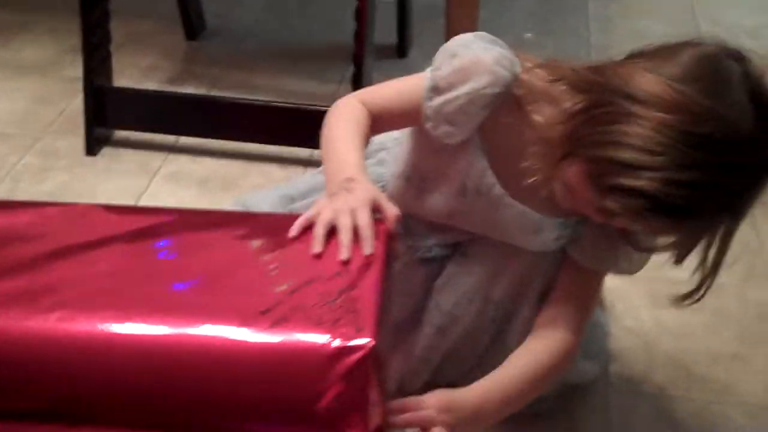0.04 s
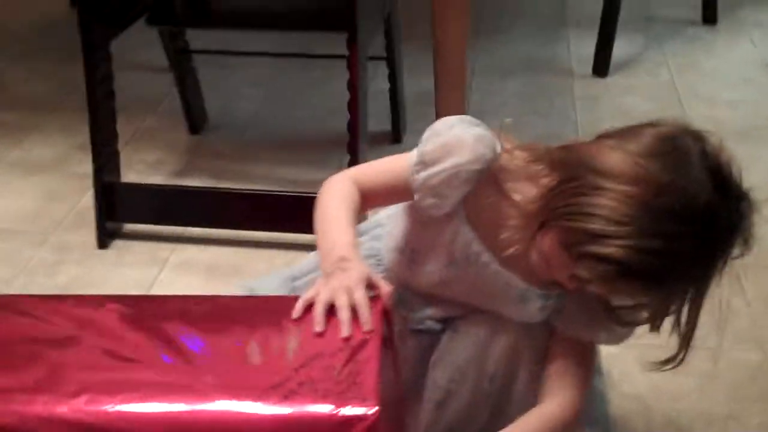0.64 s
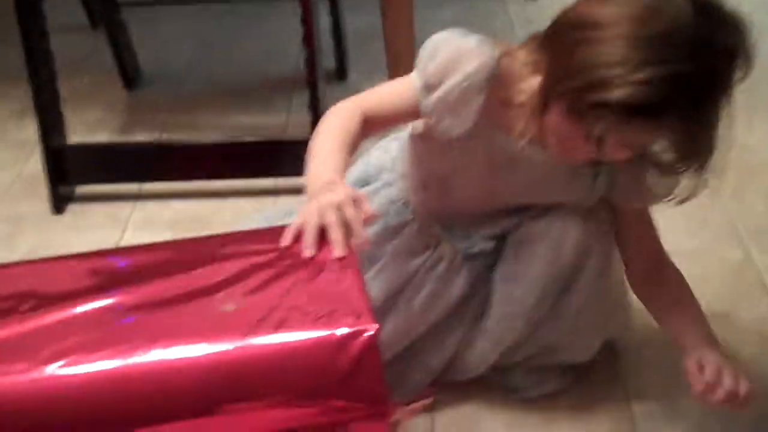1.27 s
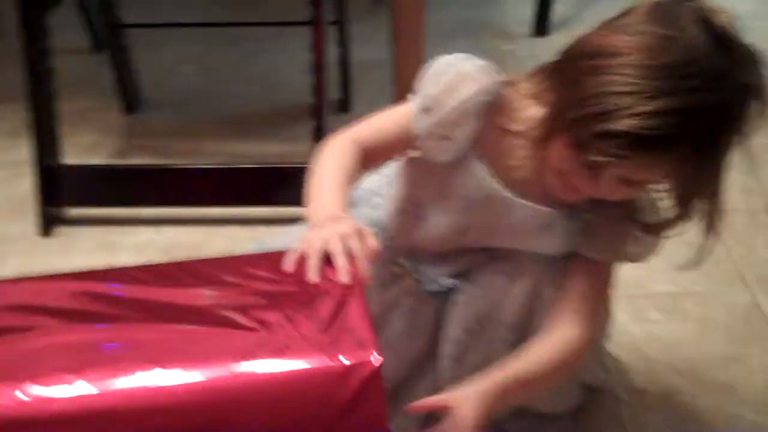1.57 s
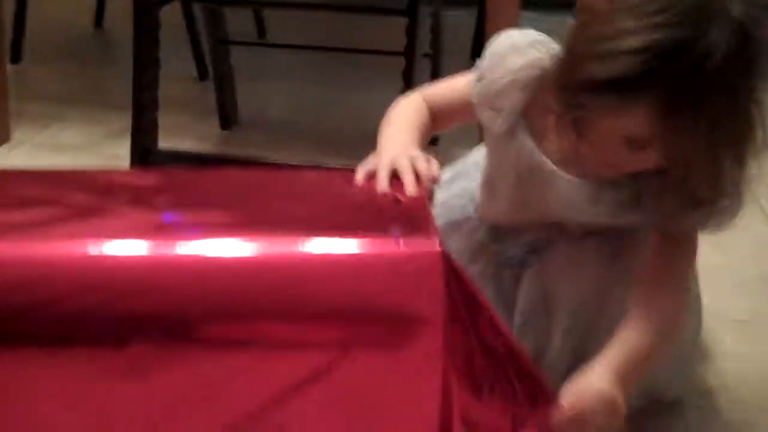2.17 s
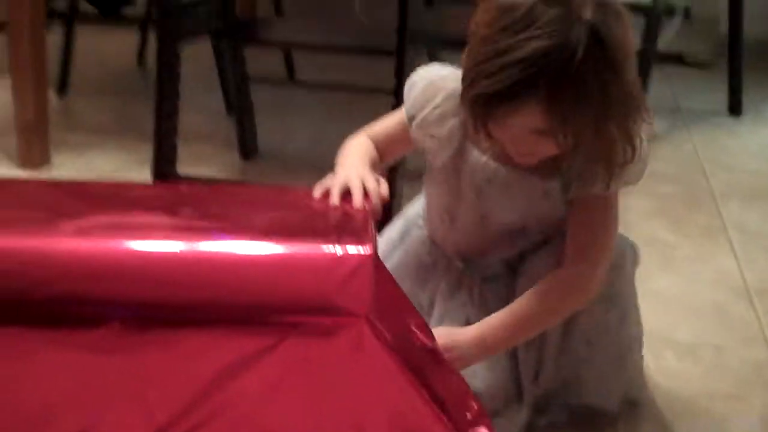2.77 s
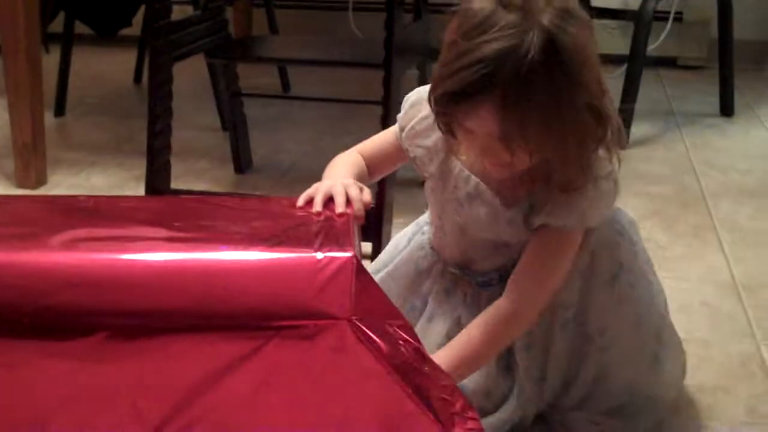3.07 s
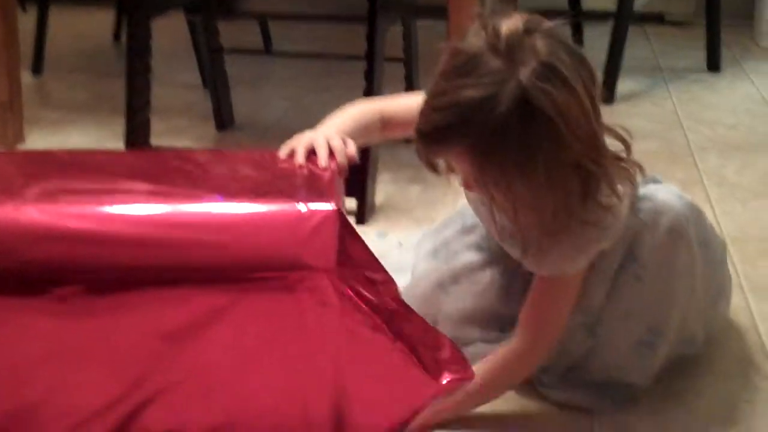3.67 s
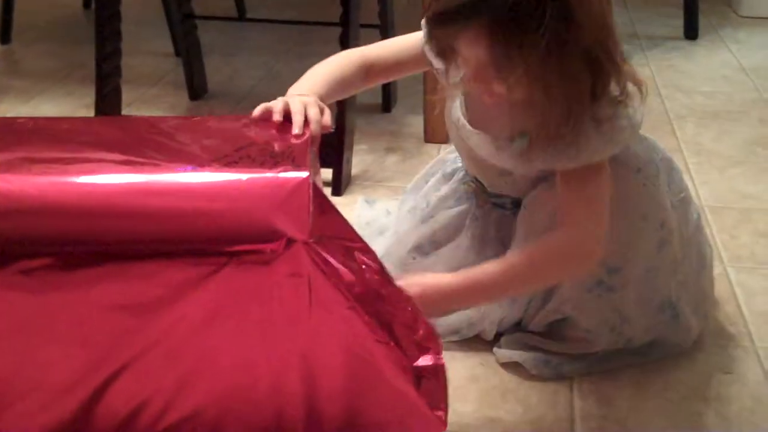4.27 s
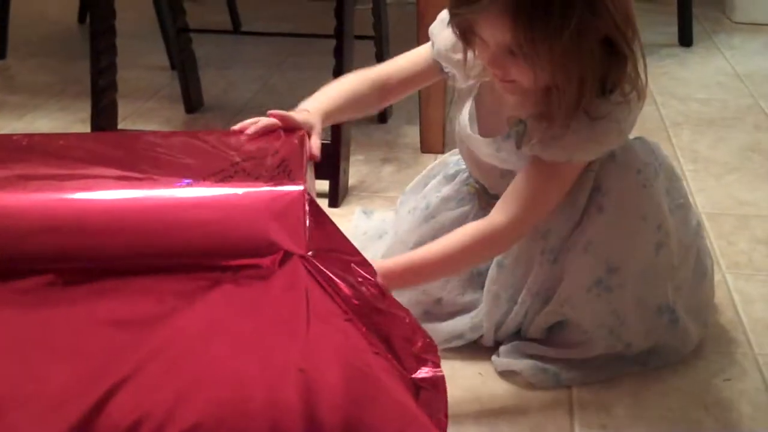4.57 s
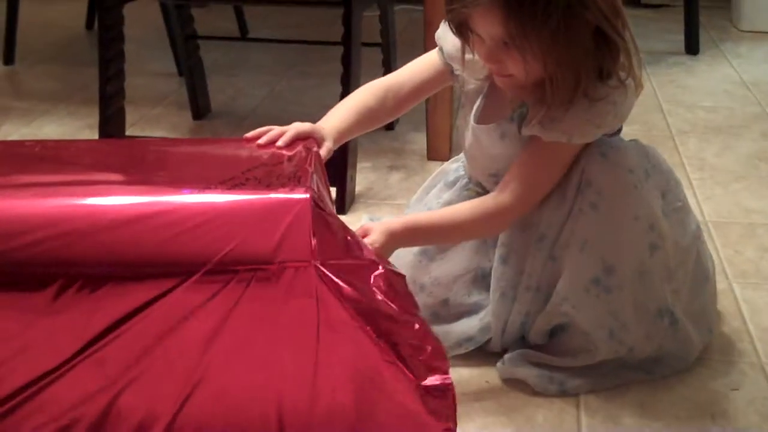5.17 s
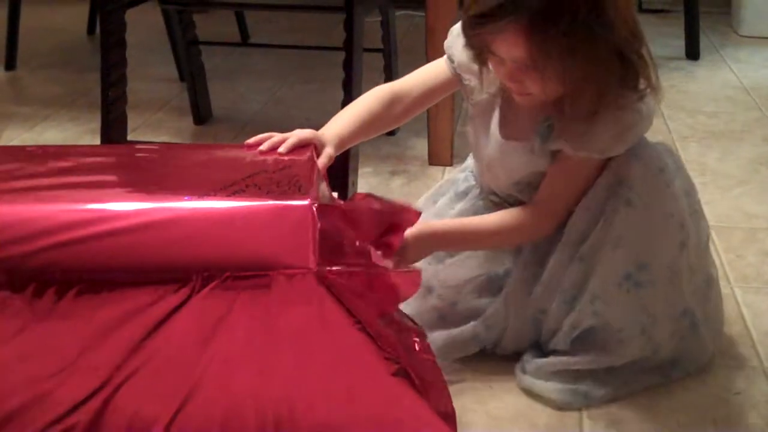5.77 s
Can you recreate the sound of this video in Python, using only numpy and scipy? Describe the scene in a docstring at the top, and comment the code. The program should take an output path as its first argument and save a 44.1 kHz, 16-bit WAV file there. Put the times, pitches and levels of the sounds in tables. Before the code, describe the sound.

Sharp, bright crinkles of foil gift wrap being gripped and folded around a large box indoors, with a few soft hollow thuds.

```python
"""A child grips and pulls the foil wrapping of a large box on a tiled kitchen floor, over a soft hiss.
First, creases snap one by one and fine crackle follows the hands. Near 1 s a whole panel buckles in a
dense run of clicks, and the box and the loose sheet bump dully. After a lull come more bursts, near 2 s
and from 3.2 s, then scattered snaps up to the loudest one at 5.65 s. All along, two small microphones
ring near 7 kHz, and they overload on the loudest snaps."""
import sys
import numpy as np
from scipy import signal
from scipy.fft import rfft, irfft, next_fast_len
from scipy.io import wavfile
from scipy.ndimage import uniform_filter1d, minimum_filter1d

SR = 44100
rng = np.random.default_rng(int(sys.argv[2]) if len(sys.argv) > 2 else 0)


def put_to_file(sound):
    """Save the sound as 16-bit audio at rate SR, in the file named by the first command-line argument."""
    columns = np.atleast_2d(sound).T  # one column per channel
    safe = np.clip(columns, -1, 1)
    whole_steps = np.round(safe * 32767)
    wavfile.write(sys.argv[1], SR, whole_steps.astype(np.int16))


N = 266364
FFT_SIZE = next_fast_len(N + SR, real=True) // 2 * 2   # spare room for echoes to die away
FREQS = np.arange(FFT_SIZE // 2 + 1) * SR / FFT_SIZE
FACETS_HZ = np.linspace(2800, 10500, 8)   # pitches of the facets, the flat patches between creases


# Loud or lone creases flipping over: start_s, level_db, pitch_hz, body_offset_db
SNAPS = [(0.066, -11.5, 7100, -20), (0.206, -11.5, 6300, -9), (0.278, -12, 8300, -24),
         (0.3542, -8.5, 6800, -6.5), (0.4362, -14, 8900, -25), (0.504, -19.5, 5000, -4),
         (0.5754, -9.5, 9500, -20), (0.6534, 2, 8800, -27), (0.6737, -4.5, 5100, -22),
         (0.732, 3, 5000, -27), (0.7757, -4, 7700, -23), (0.8169, -5.5, 7900, -10), (0.8826, -3, 7900, -11),
         (0.9126, -1, 8500, -31), (0.9541, -2, 10600, -34), (0.999, -0.5, 8200, -21.5),
         (1.0305, 12, 8100, -5), (1.0615, 5.5, 3700, -2), (1.223, -8, 8000, -16), (1.6615, -6, 10000, -16),
         (1.718, -2, 7100, -22), (1.7433, -3, 6800, -8), (1.818, -10, 7400, -25), (1.868, -11.5, 5600, -15),
         (1.918, -3.5, 6100, -12), (1.948, 2.5, 8200, -17), (2.0073, -4, 6800, -10),
         (2.0348, 2.5, 6400, -7), (2.0557, 9, 5100, -3.5), (2.194, -8.5, 6100, -17),
         (2.2221, -10, 7400, -4.5), (2.2326, -13, 6600, -22), (2.2874, -13, 6500, -12),
         (2.3125, -8.5, 4000, -4), (2.3375, -10.5, 6100, -19), (2.416, -4, 5800, -2),
         (2.4526, -5, 6000, -9), (2.509, 1, 7800, -16), (2.6015, -11.5, 5700, -25), (2.7093, -8, 5500, -7),
         (3.104, -20, 3700, -22), (3.1308, -20, 5100, -18), (3.1824, -13.5, 9600, -14),
         (3.2162, -3, 5400, -9.5), (3.245, 2.5, 5100, -28), (3.3243, -11.5, 7600, -18),
         (3.3702, -3.5, 10500, -12), (3.3866, -5.5, 7700, -25), (3.4036, -4.5, 4300, -11.5),
         (3.4906, -12, 5800, -17), (3.527, -10, 4400, -3.5), (3.577, 1.5, 3700, -25),
         (3.6417, -3.5, 5800, -8.5), (3.6872, 7.5, 7500, -8), (3.837, 0, 5200, -13.5),
         (3.9668, -8.5, 2700, -4.5), (3.9985, 5, 5700, -8.5), (4.0276, 2.5, 3000, -3),
         (4.0673, -2, 4700, -9), (4.4589, -5.5, 6800, -6), (4.62, -8, 6300, -9), (4.683, -2.5, 6700, -20),
         (4.7546, -2, 5300, -4), (4.7987, -0.5, 8400, -18), (4.8391, -7.5, 5800, -22),
         (4.8593, -8, 6400, -22), (4.9664, 4.5, 8000, -18), (5.096, -7.5, 5800, -3),
         (5.1894, -6.5, 3000, -5.5), (5.2044, -3.5, 7600, -18), (5.2314, -10, 6700, -7),
         (5.2851, -8, 6400, -12), (5.358, 1, 6100, -5.5), (5.432, 0, 6100, -13), (5.5302, -9, 8000, -15),
         (5.607, -3.5, 5300, -7), (5.6542, 15, 9000, -3.5), (5.8289, -7.5, 3900, -6),
         (5.9065, -4.5, 8100, -11), (5.959, -1, 4900, -15), (5.9817, 5.5, 6600, -13),
         (6.0254, -5, 5100, -8)]
def snaps(treble_db, body_db, shiver_s, shiver_gain, bounce_s, bounce_db):
    """A crease flips with a click and a shiver, striking a facet (treble) and the wide sheet (body)."""
    blows = np.zeros((2, len(FACETS_HZ), N))
    t = np.arange(256) / SR
    for start_s, level_db, pitch_hz, body_offset_db in SNAPS:
        nearest_facet = np.argmin(np.abs(FACETS_HZ - pitch_hz))
        treble, body = blows[:, nearest_facet]
        flip = shiver_gain * rng.standard_normal(len(t)) * np.exp(-t / shiver_s)
        flip[0] = rng.choice([-1, 1])   # the click
        flip *= from_db(level_db) / np.linalg.norm(flip)
        floor_echo = (bounce_s * rng.uniform(0.93, 0.99), from_db(bounce_db))
        for lag_s, gain in (0, 1), floor_echo:
            add(treble, start_s + lag_s, gain * from_db(treble_db) * flip)
            add(body, start_s + lag_s, gain * from_db(body_db + body_offset_db) * flip)
    return blows


# Panels of foil giving way: start_s, length_s, treble_db, body_db
BUCKLES = [(0.733, 0.0065, -12.5, -28), (1.028, 0.059, -9.5, -25), (2.053, 0.023, -5, -20.5),
           (2.088, 0.027, -5, -19), (3.242, 0.015, -16, -36), (3.686, 0.022, -12, -27),
           (3.728, 0.02, -13.5, -28.5), (5.652, 0.018, 2, -16)]
def buckles(per_s, spread_db, treble_gain_db, body_gain_db, crack_db, crack_s, release_s):
    """One crease sets off the next: a dense run of clicks that starts with a crack and dies quickly."""
    treble, body = np.zeros((2, N))
    t = np.arange(SR // 5) / SR
    crack = from_db(crack_db * np.exp(-t / crack_s))
    for start_s, length_s, treble_db, body_db in BUCKLES:
        shape = crack * np.exp(-np.maximum(t - length_s, 0) / release_s)
        add(treble, start_s, shape * from_db(treble_db + treble_gain_db))
        add(body, start_s, shape * from_db(body_db + body_gain_db))
    return np.array([treble, body]) * clicks(per_s, spread_db, window=300)


# The hands gripping or pulling: start_s, length_s, crackle_db, rustle_db
GRIPS = [(0.047, 0.08, -43.5, -44.5), (0.256, 0.13, -31, -48.5), (0.56, 0.06, -29.5, -44),
         (0.644, 0.18, -26, -42.5), (0.856, 0.09, -29, -44), (1.025, 0.067, -20.5, -31.5),
         (1.168, 0.15, -29.5, -41), (1.651, 0.05, -18.5, -33.5), (1.711, 0.06, -19.5, -32),
         (1.902, 0.15, -25, -37.5), (2.012, 0.035, -22, -33.5), (2.109, 0.089, -31, -38),
         (2.294, 0.22, -28.5, -39), (2.442, 0.064, -15.5, -29), (2.59, 0.15, -44.5, -51.5),
         (2.894, 0.027, -31, -42), (2.958, 0.052, -43, -52.5), (3.17, 0.066, -29.5, -39),
         (3.216, 0.045, -22.5, -31.5), (3.314, 0.22, -30, -44), (3.585, 0.09, -28, -39.5),
         (3.658, 0.091, -16.5, -31), (3.781, 0.12, -33, -41), (3.988, 0.018, -18.5, -30.5),
         (4.024, 0.057, -13.5, -30), (4.225, 0.03, -27.5, -42.5), (4.325, 0.053, -31.5, -45.5),
         (4.474, 0.038, -26.5, -43), (4.552, 0.052, -39, -45), (4.618, 0.25, -21.5, -36),
         (4.927, 0.13, -23.5, -40), (5.057, 0.081, -26.5, -41.5), (5.178, 0.15, -31.5, -43),
         (5.334, 0.098, -26.5, -37), (5.567, 0.12, -30.5, -46), (5.64, 0.075, -17, -30.5),
         (5.816, 0.18, -25.5, -39.5), (5.966, 0.063, -22.5, -34)]
def grips(attack_s, sag_db_per_s, release_s, rest_crackle_db, rest_rustle_db):
    """Each grip takes hold, eases off and lets go. Gives the crackle and rustle levels over time, in dB."""
    power = from_db([[rest_crackle_db], [rest_rustle_db]]) ** 2 * np.ones(N)
    t = np.arange(SR // 2) / SR
    hold = np.minimum(t / attack_s, 1) * from_db(-sag_db_per_s * t)
    for start_s, length_s, *levels_db in GRIPS:
        shape = hold * np.exp(-np.maximum(t - length_s, 0) / release_s)
        for track, level_db in zip(power, levels_db):
            add(track, start_s, (from_db(level_db) * shape) ** 2)
    return 10 * np.log10(power)


def crackle(crackle_db, rustle_db, base_per_s, spread_db, treble_db, body_db, tick_s):
    """Small creases tick faster as the hands work harder, over a soft rubbing of the sheet."""
    per_s = base_per_s * from_db(0.46 * (crackle_db - crackle_db.mean()))
    starts = clicks(per_s, spread_db, window=1200)
    fade = np.exp(-1 / (tick_s * SR))   # each tick is a short dying shiver
    tick_power = signal.lfilter([1 - fade], [1, -fade], starts ** 2 + 1e-12)
    ticks = np.sqrt(tick_power) * rng.standard_normal(N)
    rubbing = rng.standard_normal(N)
    treble = from_db(crackle_db + treble_db) * ticks
    body = from_db(rustle_db + body_db) * (ticks + rubbing)
    return np.array([treble, body])


def small_snaps(crackle_db, per_s, base_db, grip_share, spread_db, body_db):
    """Lesser creases flip at chance moments, louder under a firmer grip."""
    flips = (rng.random(N) < per_s / SR) * rng.choice([-1, 1], N)
    grip_db = grip_share * (crackle_db - crackle_db.mean())
    chance_db = spread_db * rng.uniform(-0.85, 1, N)
    treble = flips * from_db(base_db + grip_db + chance_db)
    return np.array([treble, from_db(body_db) * treble])


def wander(blows, stay_samples):
    """The crumpling keeps jumping to a facet picked by chance."""
    picks = rng.integers(0, len(FACETS_HZ), N // stay_samples + 1)
    active_facet = np.repeat(picks, stay_samples)[:N]
    return blows[:, None] * (active_facet == np.arange(len(FACETS_HZ))[:, None])


# The bright tone of a small crease: frequency_hz, level_db
CREASE_TONE = [(300, -45.5), (1200, -7), (2200, 1.5), (3200, 5), (5000, 0.5), (7000, -3), (9000, -2.5),
               (11500, 0.5), (14000, 7), (17000, -4)]
# The fuller tone of the wide sheet: frequency_hz, level_db
SHEET_TONE = [(50, -16), (130, -20.5), (280, -2), (430, -8), (650, -2.5), (1000, -1.5), (1600, 0.5),
              (2400, 4.5), (3500, 2.5), (6000, -8), (14000, -48.5)]
def foil(blows, facet_width_hz):
    """Each facet rings broadly at its pitch, shakes the sheet and has its own path through the room."""
    crease = tone_filter(CREASE_TONE)
    sheet = unit_power(tone_filter(SHEET_TONE))
    heard = 0
    for pitch_hz, treble, body in zip(FACETS_HZ, *rfft(blows, FFT_SIZE)):
        ring = unit_power(1j * FREQS * resonance(pitch_hz, facet_width_hz) * crease)
        heard = heard + (treble * ring + body * sheet) * kitchen(early_db=-2.5, late_db=-7.5)
    return irfft(heard)[:, :N]


# Dull bumps and hollow pops of the box and the loose sheet: start_s, level_db, pitch_hz
BUMPS = [(0.307, -43, 120), (0.43, -34.5, 72.6), (1.032, -37, 322), (1.069, -34, 278), (1.112, -39, 188),
         (1.2, -44, 106), (1.514, -47, 308), (1.662, -45, 198), (2.089, -29, 134.5), (2.92, -33.5, 221),
         (3.16, -39, 221), (3.5, -41, 848), (3.617, -43, 172), (3.738, -32.5, 700), (3.742, -29.5, 120.7),
         (3.798, -43, 83), (4.775, -41.5, 799), (5.354, -37, 1742), (5.652, -24, 245.2), (5.654, -27, 648),
         (5.934, -44.5, 315)]
def bumps(gain_db, rise_cycles, decay_cycles, least_decay_s, width_octaves):
    """A bump sets a panel ringing in many tones, strongest near its pitch; the low ones last longer."""
    track = np.zeros(N)
    t = np.arange(SR // 5) / SR
    for start_s, level_db, pitch_hz in BUMPS:
        octaves = (np.linspace(-1.2, 2, 14) + rng.uniform(-0.1, 0.1, 14))[:, None]
        tones_hz = pitch_hz * 2 ** octaves
        rise = 1 - np.exp(-t * tones_hz / rise_cycles)
        decay = np.exp(-t / (least_decay_s + decay_cycles / tones_hz))
        rings = rise * decay * np.sin(2 * np.pi * (tones_hz * t + rng.random(tones_hz.shape)))
        thud = np.sum(rings / (1 + (octaves / width_octaves) ** 2), axis=0)
        add(track, start_s, from_db(level_db + gain_db) * thud / np.std(thud[:SR // 25]))
    return track


def sheet_wobble(gain_db, decay_s, top_hz, width_hz):
    """After every bump the loose sheet wobbles on for a moment as a low, dying flutter."""
    swing = np.zeros(N)
    t = np.arange(SR // 2) / SR
    for start_s, level_db, _ in BUMPS:
        add(swing, start_s, from_db(level_db + gain_db) * np.exp(-t / decay_s))
    return filtered(swing * rng.standard_normal(N), unit_power(resonance(top_hz, width_hz)))


# The tone of the echoes, dull at the very top: frequency_hz, level_db
WALL_TONE = [(100, -2.5), (500, 2), (2500, 1.5), (7000, 0), (10000, -3.5), (14000, -5.5)]
def kitchen(early_db, late_db, early_fade_s=0.021, late_fade_s=0.34):
    """Sound arrives directly, then scattered by box and chairs, then as the ring of the tiled room."""
    t = np.arange(SR // 2) / SR
    echoes = 0
    for level_db, fade_s, start_s in (early_db, early_fade_s, 0.0006), (late_db, late_fade_s, 0.007):
        shape = from_db(-60 * t / fade_s) * (t > start_s)
        noise = rng.standard_normal((2, len(t)))
        echoes = echoes + from_db(level_db) * shape / np.linalg.norm(shape) * noise
    left_lag_s = 4.2e-5 + 1.2e-5 * rng.standard_normal()
    direct = np.array([np.exp(-2j * np.pi * FREQS * left_lag_s), np.ones(len(FREQS))])
    return direct + room_spread(echoes) * from_db(curve(WALL_TONE))


# The tone of the background hiss: frequency_hz, level_db
HISS_TONE = [(25, -18.5), (70, -6.5), (120, 4), (250, -3), (420, -2.5), (700, -2), (1300, -7.5), (2500, -8),
             (6000, -14.5), (14000, -17)]
# How loud the hiss is heard: time_s, level_db
HISS_LEVEL = [(0, -46), (1.6, -45), (2.7, -49), (4.2, -48), (6.04, -50)]
def background_hiss():
    """A soft, low background hiss, heard a little quieter after the first seconds."""
    noise = room_spread(rng.standard_normal((2, FFT_SIZE)))
    hiss = irfft(noise * unit_power(tone_filter(HISS_TONE)))[:, :N]
    level_db = np.interp(np.arange(N) / SR, *np.transpose(HISS_LEVEL))
    return from_db(level_db) * hiss


# How alike the room sounds at the two microphones: frequency_hz, likeness_0_to_1
LIKENESS = [(100, 0.85), (600, 0.91), (1400, 0.75), (2800, 0.25), (6000, 0), (12000, 1)]
def room_spread(noise_pair):
    """Blend two noises into left and right spectra, alike in the bass and at the very top."""
    shared, side = rfft(noise_pair, FFT_SIZE)
    alike = np.clip(curve(LIKENESS), 0, 1)
    return (np.sqrt(1 + alike) * shared + np.sqrt(1 - alike) * side * [[1], [-1]]) / np.sqrt(2)


def clicks(per_s, spread_db, window):
    """Random clicks, many small and few large, evened out in power over `window` samples."""
    heights = from_db(spread_db * np.minimum(rng.exponential(1, N), 4)) * rng.choice([-1, 1], N)
    train = heights * (rng.random(N) < per_s / SR)
    return train / np.sqrt(np.abs(uniform_filter1d(train ** 2, window)) + 1e-4)


def from_db(db):
    """Turn decibels into a gain."""
    return 10 ** (np.asarray(db) / 20)


def curve(points):
    """Join a table's points to get a value at every frequency."""
    hz, value = np.transpose(points)
    return np.interp(np.log(FREQS + 1), np.log(hz), value)


def tone_filter(points):
    """Turn a tone table into a filter in which nothing sounds early (minimum phase)."""
    cepstrum = irfft(np.log(from_db(curve(points))))
    cepstrum[1:FFT_SIZE // 2] *= 2
    cepstrum[FFT_SIZE // 2 + 1:] = 0
    return np.exp(rfft(cepstrum))


def unit_power(response):
    """Scale a filter so that white noise keeps its power."""
    return response / np.sqrt(np.mean(np.abs(response) ** 2))


def filtered(sound, response):
    """Pass a sound through a filter."""
    return irfft(rfft(sound, FFT_SIZE) * response)[..., :N]


def resonance(hz, width_hz):
    """A filter that passes the lows, rings near hz and fades above it."""
    return 1 / (1 - (FREQS / hz) ** 2 + 1j * FREQS * width_hz / hz ** 2)


def add(track, start_s, piece):
    """Mix a piece into a track."""
    start = max(0, round(start_s * SR))
    track[start:start + len(piece)] += piece[:max(0, N - start)]


def scene():
    """Foil, box and background hiss in the kitchen, in stereo."""
    crackle_db, rustle_db = grips(attack_s=0.015, sag_db_per_s=6, release_s=0.029,
                                  rest_crackle_db=-57, rest_rustle_db=-61)
    runs = buckles(per_s=6000, spread_db=1.5, treble_gain_db=-10.5, body_gain_db=-1.5,
                   crack_db=10, crack_s=0.0048, release_s=0.0017)
    ticks = crackle(crackle_db, rustle_db, base_per_s=850, spread_db=3.5,
                    treble_db=-9.5, body_db=-4.5, tick_s=0.00022)
    lesser = small_snaps(crackle_db, per_s=50, base_db=-21.5, grip_share=0.75, spread_db=5, body_db=-6.5)
    lone = snaps(treble_db=2, body_db=5, shiver_s=0.00068, shiver_gain=0.44,
                 bounce_s=0.0035, bounce_db=-15)
    crumpling = wander(runs + ticks + lesser, stay_samples=90)
    wrapping = foil(lone + crumpling, facet_width_hz=4600)
    thuds = bumps(gain_db=-1.5, rise_cycles=0.64, decay_cycles=0.83,
                  least_decay_s=0.0099, width_octaves=0.52)
    wobble = sheet_wobble(gain_db=-14, decay_s=0.079, top_hz=131, width_hz=170)
    box = filtered(thuds + wobble, kitchen(early_db=-17, late_db=-4.5))
    return wrapping + box + background_hiss()


def limiter(sound, ceiling_db, release_db_per_s, window):
    """The volume ducks just ahead of a peak above the ceiling and climbs back at a steady rate."""
    over_db = np.maximum(20 * np.log10(np.abs(sound).max(axis=0) + 1e-9) - ceiling_db, 0)
    climb_db = release_db_per_s * np.arange(N) / SR
    held_db = np.maximum.accumulate(over_db + climb_db) - climb_db
    gain_db = uniform_filter1d(minimum_filter1d(-held_db, window), window)
    return sound * from_db(gain_db)


# The duller tone of the right microphone: frequency_hz, level_db
RIGHT_MIC_TONE = [(100, -1.5), (1000, -1.5), (4000, -2), (6500, -1), (9000, -7), (14000, -13.5)]
def record(dry, cutoff_hz=14400):
    """Each microphone's opening rings; the loudest peaks are limited and clip; the top treble is cut."""
    left = resonance(hz=7490, width_hz=1060)
    right = resonance(hz=6940, width_hz=1470) * tone_filter(RIGHT_MIC_TONE)
    picked_up = filtered(dry, np.array([left, right]))
    limited = limiter(picked_up, ceiling_db=10, release_db_per_s=248, window=24)
    clipped = np.clip(limited, -1, 1)
    low_pass = signal.ellip(10, 0.1, 70, cutoff_hz, fs=SR, output="sos")
    return signal.sosfilt(low_pass, clipped)


dry = scene()
out = record(dry)
put_to_file(out)
```